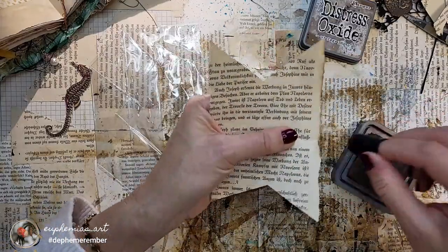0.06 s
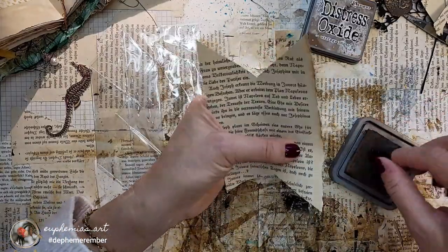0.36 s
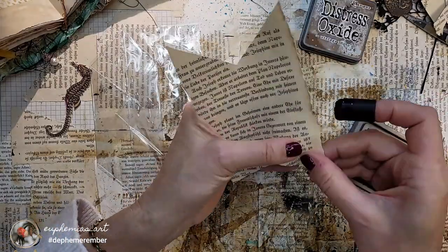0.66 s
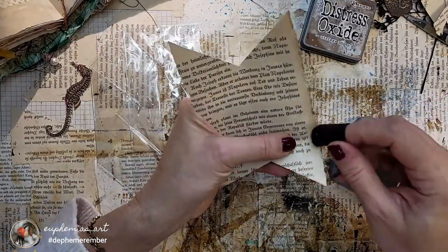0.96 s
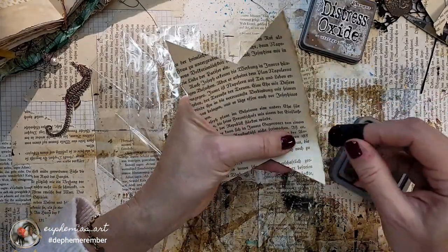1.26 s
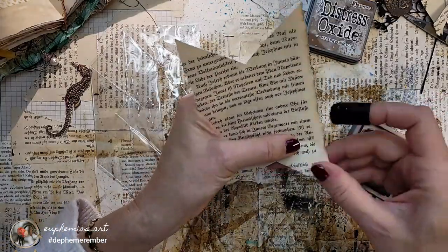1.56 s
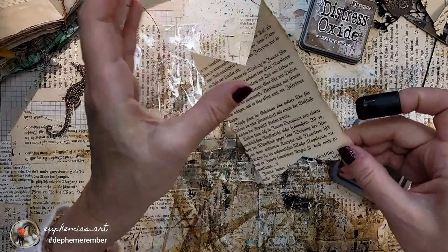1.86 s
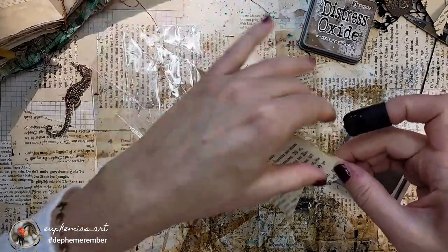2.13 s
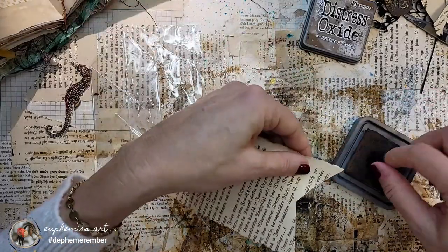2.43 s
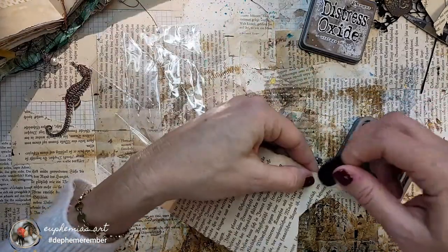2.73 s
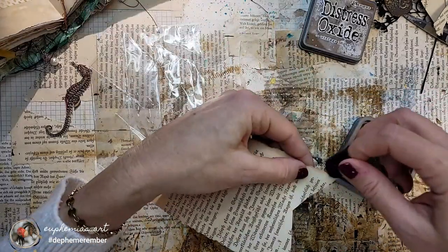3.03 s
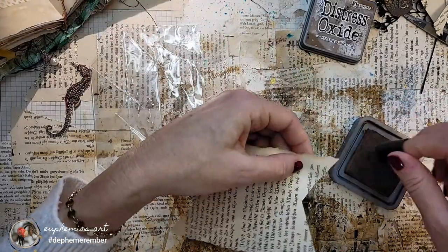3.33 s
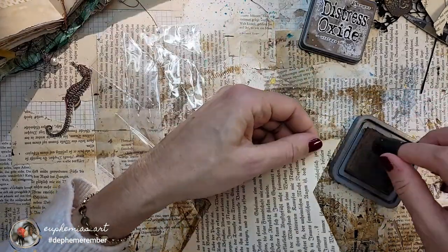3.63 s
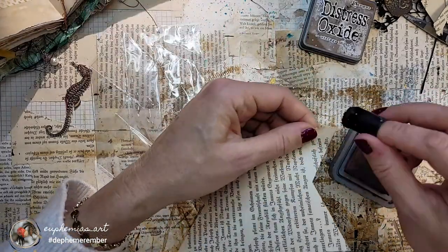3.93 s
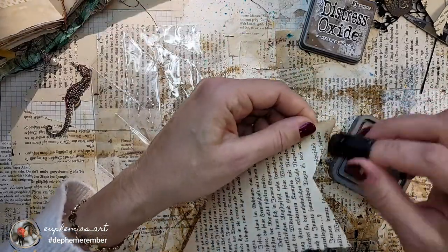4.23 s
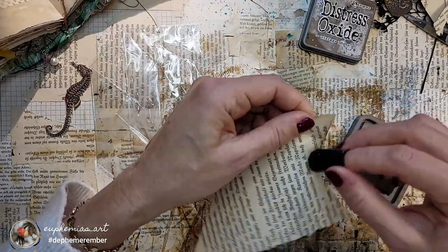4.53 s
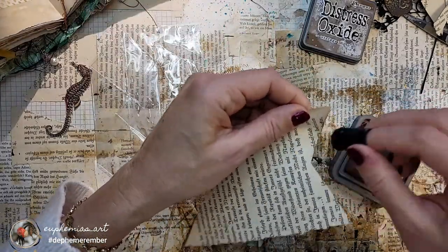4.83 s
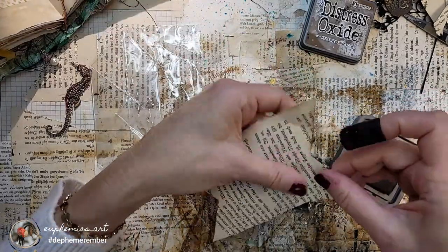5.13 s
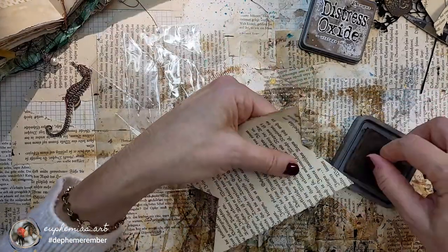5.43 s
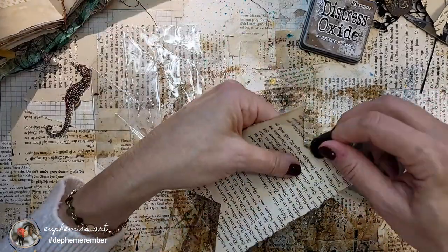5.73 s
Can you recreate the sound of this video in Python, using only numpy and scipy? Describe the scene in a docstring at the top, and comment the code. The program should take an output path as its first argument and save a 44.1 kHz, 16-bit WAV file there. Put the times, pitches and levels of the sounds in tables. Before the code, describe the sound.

A foam dauber brushes and rubs a paper edge in short, soft strokes, with paper flaps and light ink pad taps.

```python
"""A foam dauber inks the edge of a folded book page, close to a stereo microphone.
Stick-slip friction of foam and fingers makes a hiss that the sheet's resonances colour. After each
dab the edge flaps and the sheet slides back; the paper also snaps, and swishes as it is turned.
Taps excite the damped modes of the sheet, and presses on the ink pad those of its case and the table.
The hands rustle faintly throughout, in a small, quiet room."""
import sys
import numpy as np
from scipy import signal
from scipy.fft import rfft, irfft, next_fast_len
from scipy.io import wavfile
from scipy.ndimage import map_coordinates

SR = 44100
rng = np.random.default_rng(int(sys.argv[2]) if len(sys.argv) > 2 else 0)


def waveform_to_disk(signal):
    """Save audio, clipped to [-1, 1], as 16-bit WAV at the path in sys.argv[1]."""
    frames = np.transpose(np.atleast_2d(signal))
    scaled = np.clip(frames, -1, 1) * 32767
    samples = np.round(scaled).astype(np.int16)
    wavfile.write(sys.argv[1], SR, samples)


N = 255339

# Flicks of foam over the edge: start_s, held_s, level_db, body_db, flap_db
DAB_STROKES = [(.055, 0.021, -32, -9.5, -31.5), (.797, 0.034, -38, -1.5, -37),
               (1.025, 0.0095, -47.5, -4, -42), (1.061, 0.014, -29.5, -6, -50), (1.223, .012, -55, 1, -70),
               (1.266, 0.019, -36, -10, -62), (1.414, .022, -46, -5.5, -64), (1.454, .017, -37.5, -2, -50),
               (3.917, 0.033, -37, -8, -33), (4.155, 0.035, -36, -11.5, -37.5),
               (4.364, .026, -47, 3.5, -66), (4.39, 0.034, -32, -1, -46), (4.612, .032, -32.5, 0, -53),
               (4.808, .014, -45, 1, -64), (4.829, .018, -32, 1, -34.5), (5.778, 0.017, -42.5, -10, -60)]


def amp(db):
    """Decibels to amplitude ratio."""
    return 10 ** (np.asarray(db) / 20)


def unit(x):
    """Normalise to rms 1."""
    return x / np.sqrt(np.mean(x ** 2) + 1e-20)


def along(points, hz):
    """Interpolate (frequency_hz, value) points on a logarithmic frequency axis."""
    knots_hz, values = np.transpose(points)
    return np.interp(np.log(hz + 1), np.log(knots_hz + 1), values)


def filtered(x, response):
    """Linear filtering: multiply the spectrum by a frequency response."""
    n = x.shape[-1]
    padded = next_fast_len(n + 4096)
    return irfft(rfft(x, padded) * response(np.fft.rfftfreq(padded, 1 / SR)), padded)[..., :n]


def wobble(n, rate_hz):
    """Low-pass noise: a spline through random knots."""
    knots = rng.standard_normal(int(n * rate_hz / SR) + 4)
    return map_coordinates(knots, [np.arange(n) * rate_hz / SR])


def add(track, start_s, sound):
    """Superpose a sound on the track."""
    i = round(start_s * SR)
    part = sound[..., max(-i, 0):max(N - i, 0)]
    track[..., max(i, 0):max(i, 0) + part.shape[-1]] += part


def stereo(pair, colour_db):
    """Partial coherence: two independent signals become channels alike in the bass, apart in the treble."""
    # Likeness of left and right: frequency_hz, correlation
    coherence = [(100, 0.6), (900, 0.68), (1800, 0.83), (3500, 0.4), (6000, -0.035), (10000, 0.071),
                 (15000, -0.2)]

    def response(hz):
        angle = np.arccos(np.clip(along(coherence, hz), -1, 1)) / 2
        return amp(colour_db(hz)) * np.array([np.cos(angle), np.sin(angle)])

    mid, side = filtered(pair, response)
    return np.array([mid + side, mid - side])


def ring(modes, t, attack_s, scatter_db):
    """Free vibration: a sum of damped sinusoids, their strengths varying from blow to blow."""
    hz, db, t60 = np.transpose(modes)[:, :, None]
    signs = (-1) ** np.arange(len(hz))[:, None]
    strengths = signs * amp(db + scatter_db * rng.standard_normal(hz.shape))
    partials = strengths * amp(-60 * t / t60) * np.sin(2 * np.pi * hz * t)
    return partials.sum(axis=0) * (1 - np.exp(-t / attack_s))


def fibres(n, catches_per_s, catch_share, judder_db):
    """Stick-slip friction: tiny slips blur into hiss, a few fibres catch harder, the grip judders."""
    caught = rng.random(n) < catches_per_s / SR
    catches = caught * rng.standard_normal((2, n)) * np.sqrt(SR / catches_per_s)
    slips = np.sqrt(1 - catch_share) * rng.standard_normal((2, n)) + np.sqrt(catch_share) * catches
    return unit(slips * amp(judder_db * wobble(n, 220)))


def pressure_db(t, held_s, rise_s, fall_s, arch_db):
    """Friction level follows pressure: an arch, with flanks changing 15 dB in rise_s and fall_s."""
    flanks = np.maximum(-t / rise_s, 0) ** 1.23 + np.maximum((t - held_s) / fall_s, 0)
    return -15 * flanks + arch_db * (np.sin(np.pi * np.clip(t / held_s, 0, 1)) - .5)


def sheet_db(hz, time_s, low_db, high_db, between_db, log_width, ripple_db):
    """Resonance: the grip sets two broad peaks; a fine random ripple colours each stroke differently."""
    # Resonances for each grip: start_s, low_hz, high_hz
    grips = [(0, 1660, 3650), (.3, 1530, 2770), (.78, 1540, 3600), (1.0, 1610, 2980), (1.36, 1500, 3900),
             (1.9, 1750, 4860), (2.55, 1890, 3900), (3.29, 1710, 3600), (3.45, 2130, 5660),
             (3.8, 1700, 2710), (5.0, 1870, 4260)]
    low_hz, high_hz = [pair for start_s, *pair in grips if start_s <= time_s][-1]
    bump = lambda centre_hz: np.exp(-(np.log((hz + 1) / centre_hz) / log_width) ** 2)
    broad = low_db * bump(low_hz) + high_db * bump(high_hz) + between_db * bump(np.sqrt(low_hz * high_hz))
    ripple = map_coordinates(rng.standard_normal(1024), [hz / 129.7], mode="mirror")
    return broad + ripple_db * ripple


def strokes(rows, colour, edges_s, arch_db, **resonances):
    """Source and filter: friction noise swells and fades, coloured by the contact and the sheet."""
    out = np.zeros((2, N))
    for start_s, held_s, level_db, body_db, *_ in rows:
        # edges_s is the rise and fall of a 40 ms stroke; longer strokes move more slowly
        rise_s, fall_s = np.array(edges_s) * (held_s / .04) ** .3
        t = np.arange(-round(3 * rise_s * SR), round((held_s + 4 * fall_s) * SR)) / SR
        envelope = amp(level_db + pressure_db(t, held_s, rise_s, fall_s, arch_db))
        slips = fibres(len(t), catches_per_s=2500, catch_share=.14, judder_db=1)
        air_db = .22 * (-42.5 - level_db)  # firmer strokes are duller
        shelves = [(600, body_db), (2500, 0), (4000, .0033), (9000, air_db)]
        tone_db = lambda hz: along(colour, hz) + along(shelves, hz) + sheet_db(hz, start_s, **resonances)
        add(out, start_s + t[0], stereo(envelope * slips, tone_db))
    return out


def room_tone(level_db):
    """Stationary noise: low air rumble and microphone hiss."""
    # Noise floor: frequency_hz, gain_db
    colour = [(25, -31), (48, -5.5), (100, -5.5), (170, -11.5), (300, -11), (550, -21.5), (1200, -19.5),
              (2500, -26), (6000, -35.5), (15500, -22)]
    return amp(level_db) * unit(stereo(rng.standard_normal((2, N)), lambda hz: along(colour, hz)))


def handling(gain_db):
    """Light friction: hands and sleeves never quite stop brushing the paper."""
    # Strength of the brushing: time_s, level_db
    contour = [(0.0, -67), (0.13, -73), (0.35, -57.5), (0.53, -59.5), (0.72, -54), (1.27, -80), (1.48, -68),
               (1.9, -70), (2.47, -66), (3.03, -79.5), (3.45, -58.5), (3.64, -63.5), (4.26, -71),
               (4.56, -65), (4.72, -69.5), (4.85, -70.5), (5.71, -68.5), (5.79, -61)]
    colour = [(100, -24), (700, -10), (2200, -6.5), (4000, 2.5), (7300, 7.5), (8800, -1), (15500, -1.5)]
    slips = fibres(N, catches_per_s=900, catch_share=.12, judder_db=.7)
    brush = unit(stereo(slips, lambda hz: along(colour, hz)))
    return amp(np.interp(np.arange(N) / SR, *np.transpose(contour)) + gain_db) * brush


def arms(gain_db):
    """Amplitude-modulated noise: a low rustle swells as the hands move about."""
    # Strength of the rustle: time_s, level_db
    contour = [(0.0, -78), (0.13, -91.5), (1.61, -78), (2.1, -74), (3.08, -87.5), (3.45, -75), (3.69, -86),
               (4.72, -79), (4.87, -83.5), (5.79, -70)]
    colour = [(100, -28), (220, -2.5), (320, .5), (450, -9), (700, -13), (2000, -52)]
    rustle = unit(stereo(rng.standard_normal((2, N)), lambda hz: along(colour, hz)))
    return amp(np.interp(np.arange(N) / SR, *np.transpose(contour)) + gain_db) * rustle


def slides():
    """Sliding friction of the sheet on skin and table, including its faint recoil after each dab."""
    # Sliding contacts: start_s, held_s, level_db, body_db
    contacts = [(.01, 0.015, -42.5, 0), (.095, .05, -48, 4), (.37, 0.046, -39, -2),
                (.46, 0.044, -44.5, -14), (.583, 0.07, -38.5, -0.5), (.68, 0.02, -38, -10),
                (.718, .036, -44.5, 2), (.85, 0.039, -45.5, -10), (.93, 0.042, -54, -4),
                (1.575, .075, -52.5, -19), (1.674, 0.035, -45.5, -13.5), (1.95, .2, -64.5, 15),
                (3.84, .06, -71.5, -4), (4.49, .068, -52.5, 6), (4.69, 0.065, -58, 7.5),
                (4.885, 0.034, -57, 7), (5.054, 0.0091, -44, 10.5), (5.097, .053, -42.5, -14),
                (5.16, 0.077, -49, -8), (5.222, 0.031, -40.5, 7.5), (5.268, .05, -51.5, 10.5)]
    # Spectrum of sliding: frequency_hz, gain_db
    colour = [(60, -14.5), (200, -14), (500, -12.5), (800, -14.5), (1500, -8.5), (2200, -8), (2800, -3.5),
              (4000, -3), (5500, -3.5), (7500, -6), (8600, -12.5), (15500, -10)]
    recoils = [(start_s + held_s + .016, .04, level_db - 25, 4)
               for start_s, held_s, level_db, *_ in DAB_STROKES]
    return strokes(contacts + recoils, colour, edges_s=(.016, .05), arch_db=4.5,
                   low_db=4.5, high_db=3.5, between_db=-2, log_width=.1, ripple_db=2.5)


def dabs():
    """Transient friction: foam flicks over the edge in short bursts of broadband noise."""
    # Spectrum of a dab: frequency_hz, gain_db
    colour = [(60, -11.5), (200, -17.5), (500, -4), (720, -9.5), (950, -1.5), (1700, -1.1), (2300, -6),
              (2900, -2.5), (4000, -1), (5200, -2), (7400, 2), (8600, -7.5), (11000, -5), (15500, -4)]
    return strokes(DAB_STROKES, colour, edges_s=(.0165, .017), arch_db=4.5,
                   low_db=4, high_db=6, between_db=-1.5, log_width=.1, ripple_db=2.5)


def taps():
    """Modal excitation: each tap or flap rings the sheet around a pitch set by where it lands."""
    # The sheet is tapped or lands: start_s, peak_db, centre_hz, spread_octaves
    impacts = [(.554, -50.5, 640, 0.56), (1.451, -44, 413, 0.28), (1.859, -52.5, 980, 0.26),
               (2.282, -32.5, 700, 1.33), (2.288, -32.5, 655, 1.1), (3.28, -40, 564, 0.3),
               (4.8417, -26, 1250, 0.18), (4.842, -23.5, 2560, 0.22), (4.844, -25, 564, 0.32),
               (4.848, -42.5, 240, .5), (5.032, -49.5, 1180, 1.7), (5.256, -45, 630, .43),
               (5.286, -38, 380, .59)]
    # Modes of the sheet on the table: pitch_hz, level_db, t60_s
    sheet_modes = [(183, -8.5, 0.042), (248.5, 3, 0.059), (283.6, 0, 0.071), (392, 1.5, 0.028),
                   (484, -6.5, 0.075), (584, -1.5, 0.043), (689, 0.5, 0.035), (757, 6.5, 0.012),
                   (921, 0.5, 0.054), (1094, 11, 0.011), (1370, 9.5, 0.012), (1550, 8, 0.034),
                   (1810, 15.5, 0.012), (2360, -5.5, 0.026), (2590, 11.5, 0.0098), (3740, -9, 0.012)]
    # the edge flaps free as each dab lifts off
    flaps = [(start_s + held_s, flap_db, 590, 1.35) for start_s, held_s, *_, flap_db in DAB_STROKES]
    out, t = np.zeros(N), np.arange(SR // 5) / SR
    hz, db, t60 = np.transpose(sheet_modes)
    for start_s, peak_db, centre_hz, spread_octaves in impacts + flaps:
        reach_db = -10 * np.log10(1 + (np.log2(hz / centre_hz) / spread_octaves) ** 6)
        tap = ring(np.transpose([hz, db + reach_db, t60]), t, attack_s=.0004, scatter_db=1)
        add(out, start_s, amp(peak_db) * tap / np.abs(tap).max())
    return out


def ink_pad():
    """Impact excitation of two bodies: the plastic case clicks and the table top booms softly."""
    # Presses on the pad: start_s, click_db, thump_db
    presses = [(.305, -30.5, -38.5), (2.501, -61.5, -53), (3.507, -43.5, -52), (5.459, -54, -50)]
    # Modes of the case: pitch_hz, level_db, t60_s
    case_modes = [(216, -22, 0.164), (310, -9.5, 0.034), (508, -7.5, 0.0084), (720, -33, 0.038),
                  (770, -28, 0.0044), (917, 3, 0.01), (1257, -0.5, 0.024)]
    # Modes of the table: pitch_hz, level_db, t60_s
    table_modes = [(43.9, -16, 0.92), (55, 5, 0.092), (75, -21, 0.16), (127, -8.5, 0.11)]
    out, t = np.zeros(N), np.arange(SR) / SR
    for start_s, click_db, thump_db in presses:
        click = ring(case_modes, t, attack_s=.0006, scatter_db=1)
        thump = ring(table_modes, t, attack_s=.005, scatter_db=.5)
        add(out, start_s, amp(click_db) * click + amp(thump_db) * thump)
    return out


def cracks():
    """Broadband transients: paper snaps and the ink pad's bright click, as fast-decaying noise."""
    # Short cracks of noise: start_s, level_db, decay_s
    bursts = [(0.306, -42.5, 0.0055), (0.89, -41, 0.00085), (1.671, -50, 0.0047), (2.22, -46, 0.00089),
              (3.9516, -29.5, 0.00071), (4.192, -32, 0.00075), (4.846, -27, 0.0011), (5.235, -44, 0.00084),
              (5.449, -56, 0.011)]
    out, t = np.zeros((2, N)), np.arange(SR // 50) / SR
    for start_s, level_db, decay_s in bursts:
        add(out, start_s, amp(level_db) * np.exp(-t / decay_s) * rng.standard_normal((2, len(t))))
    return stereo(out, lambda hz: along([(200, -12), (1200, -2), (5000, 4), (15000, 0)], hz))


def swishes(width_hz):
    """Gliding resonance: the vibrating length of paper changes as the contact slides."""
    # The turning sheet brushes the hand: start_s, length_s, level_db, start_hz, end_hz
    glides = [(1.738, 0.059, -74, 4440, 3850), (1.936, 0.069, -69.5, 5100, 5470),
              (2.065, 0.077, -69, 1824, 2800)]
    out = np.zeros(N)
    for start_s, length_s, level_db, start_hz, end_hz in glides:
        n = round(length_s * SR)
        phase = 2 * np.pi * np.cumsum(np.geomspace(start_hz, end_hz, n)) / SR
        band = wobble(n, width_hz) * np.cos(phase) + wobble(n, width_hz) * np.sin(phase)
        add(out, start_s, amp(level_db) * signal.windows.tukey(n, .5) * unit(band))
    return out


def rubs():
    """Sustained friction: the foam rubs more slowly while the sheet is pinched at its tip."""
    # Rubbing contacts: start_s, held_s, level_db, body_db
    contacts = [(2.243, 0.045, -43.5, 1), (2.394, 0.069, -43, -15), (2.475, .05, -52.5, -11),
                (2.607, 0.14, -53.5, 2), (2.82, 0.072, -45.5, -1), (3.046, .036, -44, -1),
                (3.094, 0.029, -54, 8), (3.16, 0.011, -57, -23), (3.19, 0.023, -56.5, -25),
                (3.246, .044, -41.5, -1.5), (3.313, .08, -41.5, 7.5), (3.405, .067, -52.5, 5),
                (3.495, .045, -44, 5), (3.542, 0.083, -40.5, -9), (3.64, 0.057, -56, -9),
                (5.51, .105, -56, -5), (5.725, 0.023, -53, 1)]
    # Spectrum of rubbing: frequency_hz, gain_db
    colour = [(60, -17.5), (200, -21), (500, -11.5), (750, -12), (1000, -6), (1250, -13), (1650, 1),
              (2050, 0.5), (2550, -16), (3200, -8), (4000, -4), (7200, -2.5), (8600, -7.5), (15500, -5.5)]
    return strokes(contacts, colour, edges_s=(.018, .0093), arch_db=3,
                   low_db=1, high_db=5.5, between_db=1.5, log_width=.12, ripple_db=1.68)


def room(x):
    """Reverberation: convolution with a diffuse tail in which each frequency decays at its own rate."""
    # Reverberation time: frequency_hz, t60_s
    decay_times = [(100, 0.31), (500, 0.21), (2000, 0.15), (6000, .22), (15000, 0.06)]
    hz, t, noise = signal.stft(rng.standard_normal((2, SR // 2)), SR, nperseg=256)
    decay = amp(-60 * t / along(decay_times, hz)[:, None])
    _, tail = signal.istft(noise * decay, SR, nperseg=256)
    delayed = np.pad(tail, ((0, 0), (SR // 250, 0)))
    response = stereo(delayed, np.zeros_like)
    return signal.fftconvolve(x[:1], response / np.linalg.norm(response[0]), axes=1)[:, :N]


def scene():
    """Superposition of friction, small blows, their reverberation and the background."""
    friction = dabs() + rubs() + slides() + cracks() + swishes(width_hz=800)
    blows = (taps() + ink_pad()) * amp([[-.3], [.3]])  # slightly to the right
    background = handling(gain_db=.5) + arms(gain_db=-.5) + room_tone(level_db=-72.5)
    echoes = amp(-20) * room(friction) + amp(-12.5) * room(blows)
    return friction + blows + echoes + background


def record(dry):
    """Band limiting: an ideal low-pass filter removes the highest treble."""
    return filtered(dry, lambda hz: hz < 15800)


dry = scene()
out = record(dry)
waveform_to_disk(out)
```